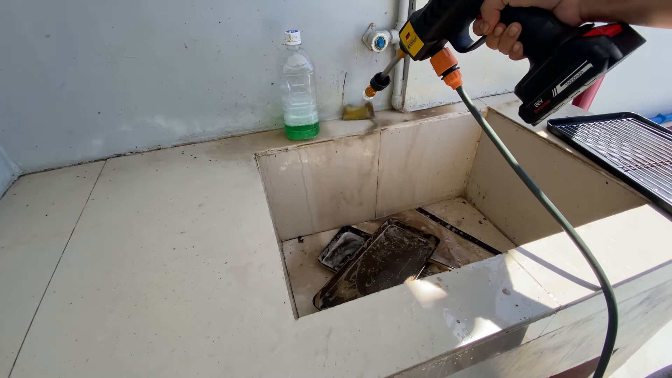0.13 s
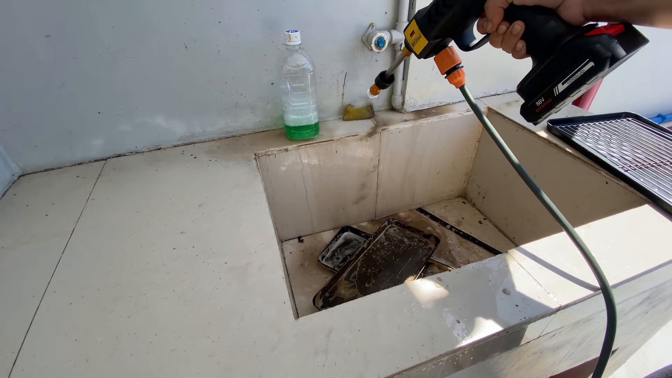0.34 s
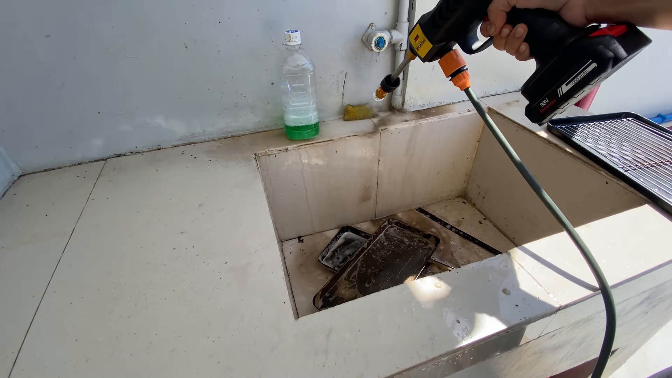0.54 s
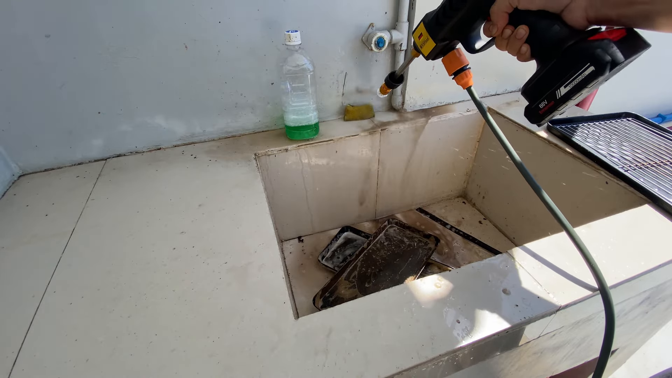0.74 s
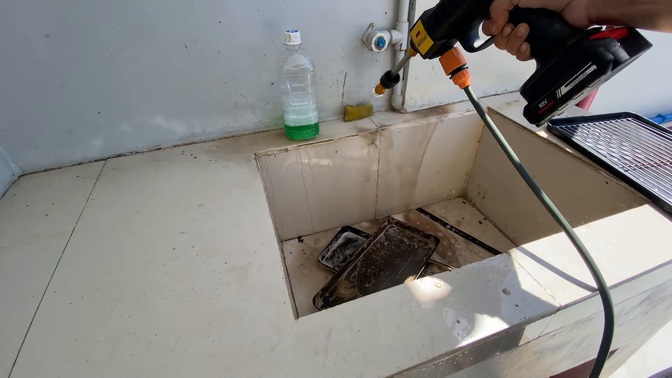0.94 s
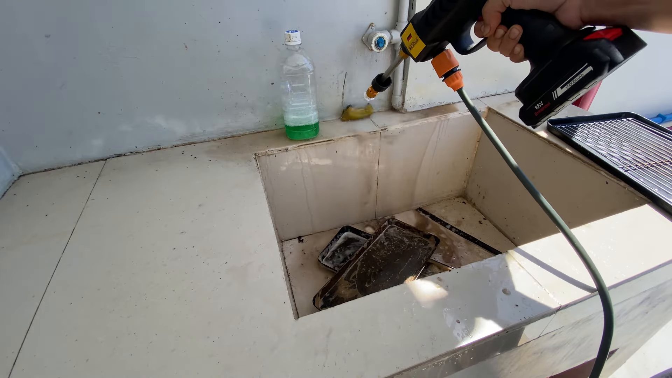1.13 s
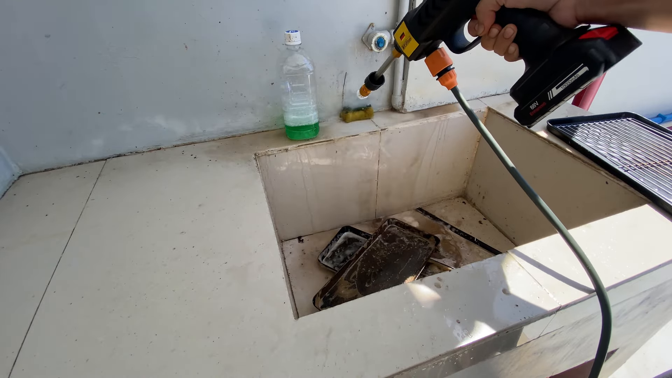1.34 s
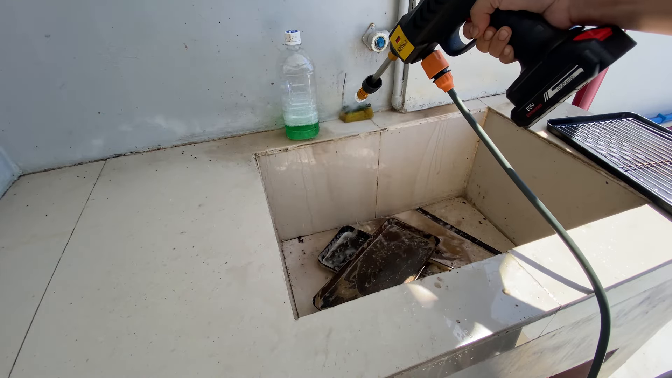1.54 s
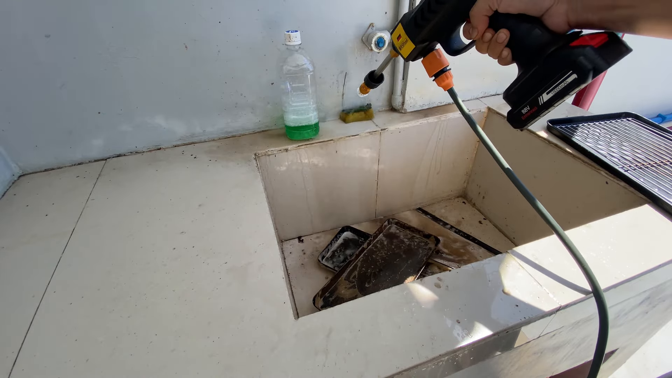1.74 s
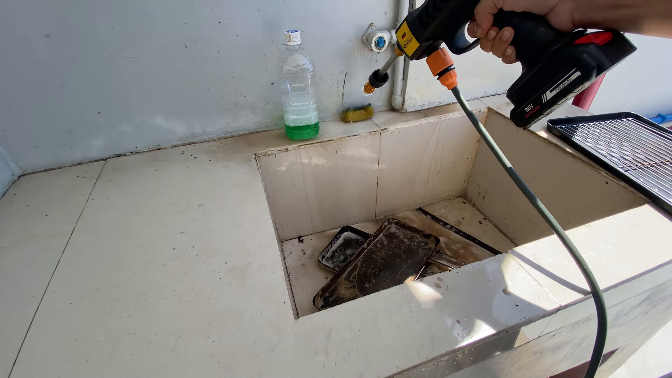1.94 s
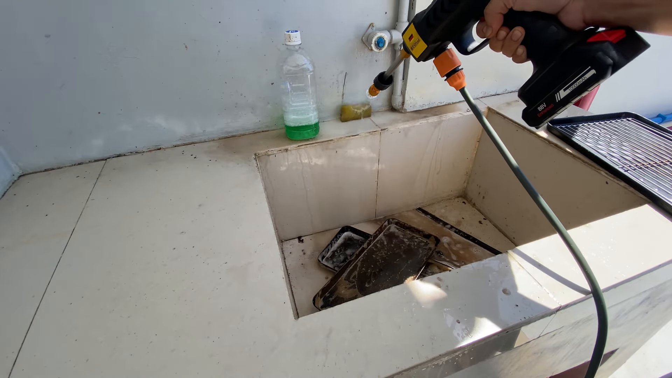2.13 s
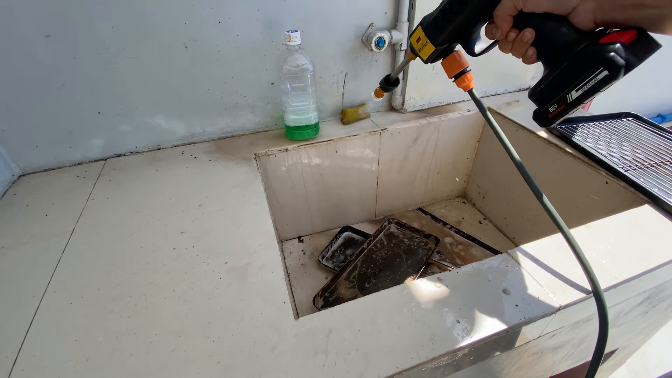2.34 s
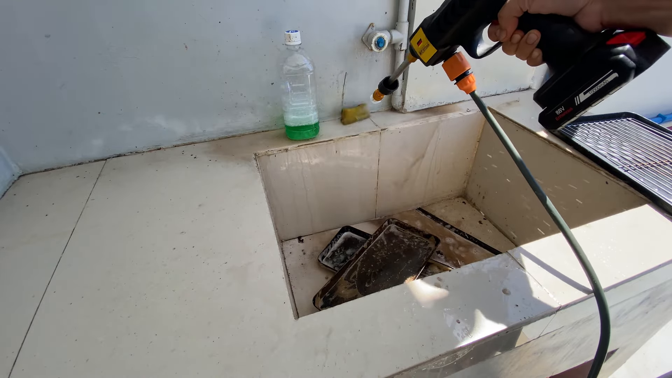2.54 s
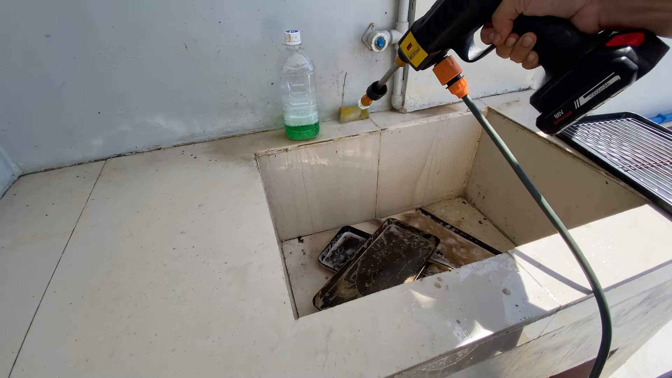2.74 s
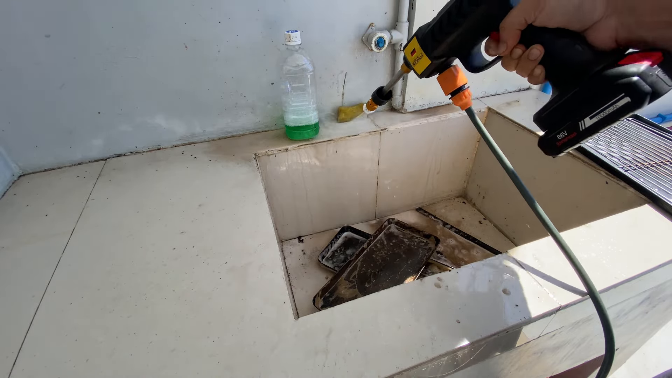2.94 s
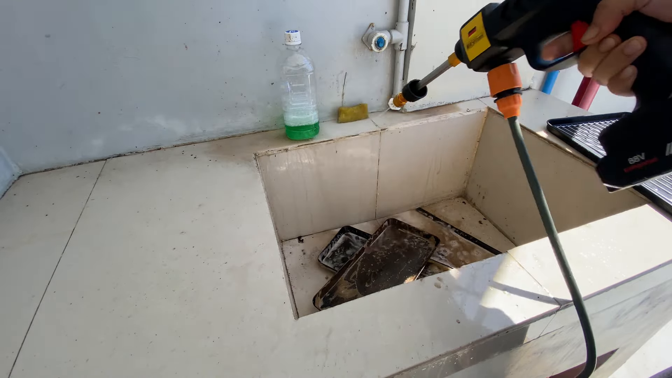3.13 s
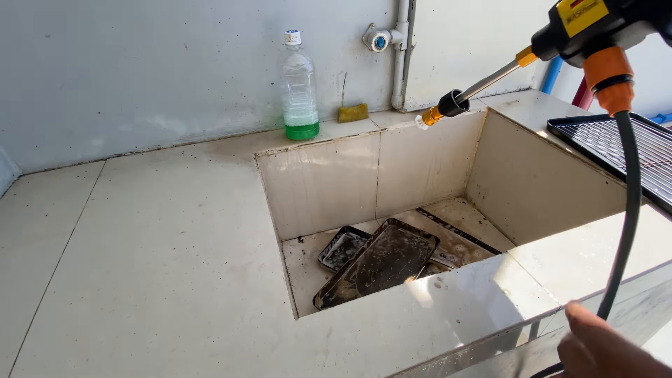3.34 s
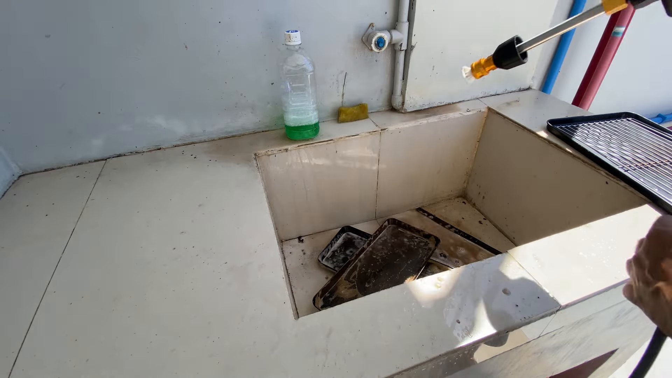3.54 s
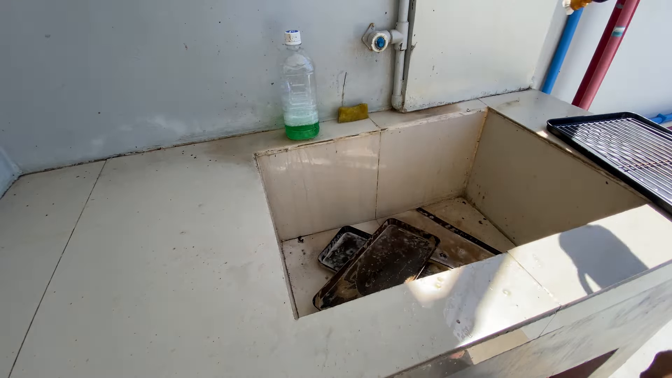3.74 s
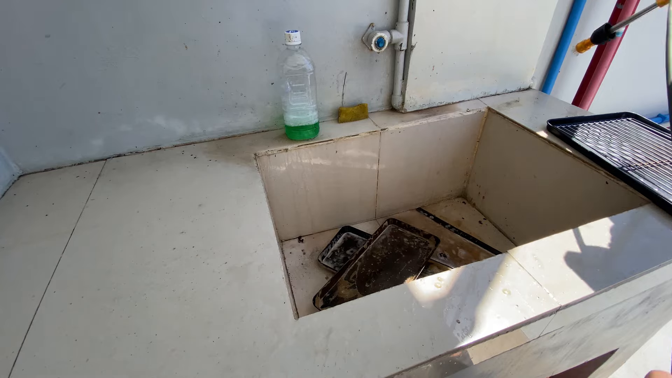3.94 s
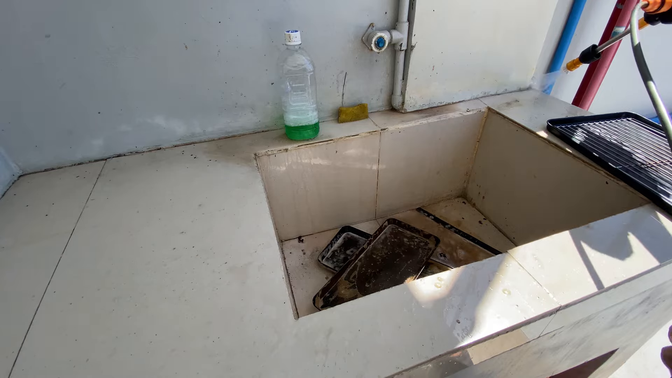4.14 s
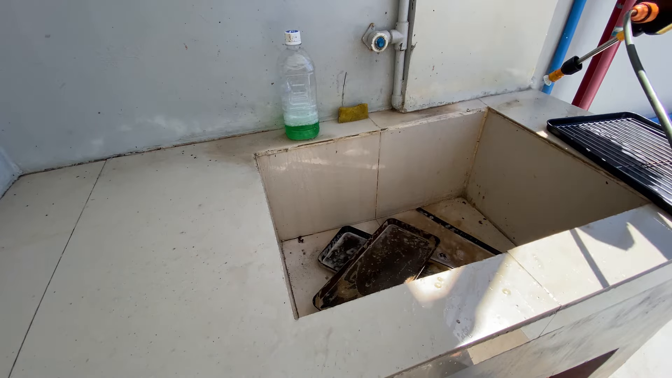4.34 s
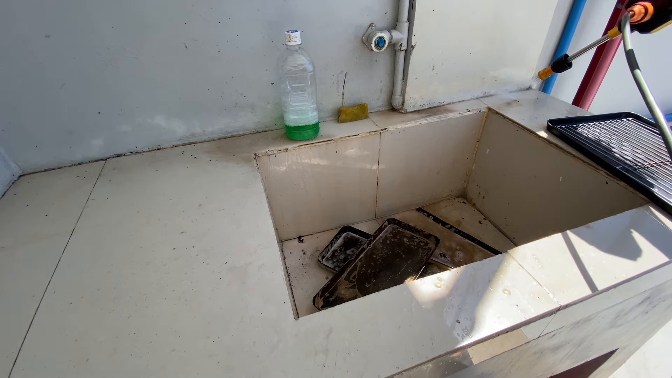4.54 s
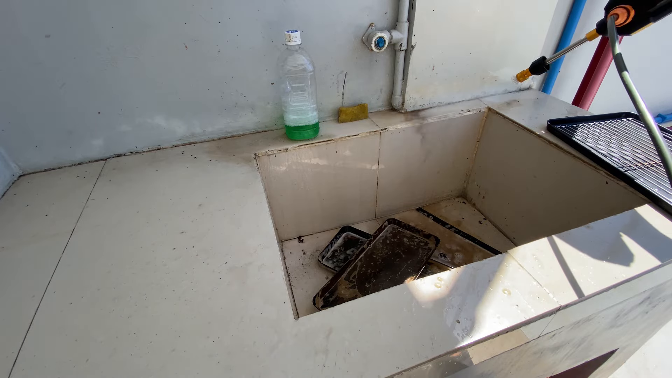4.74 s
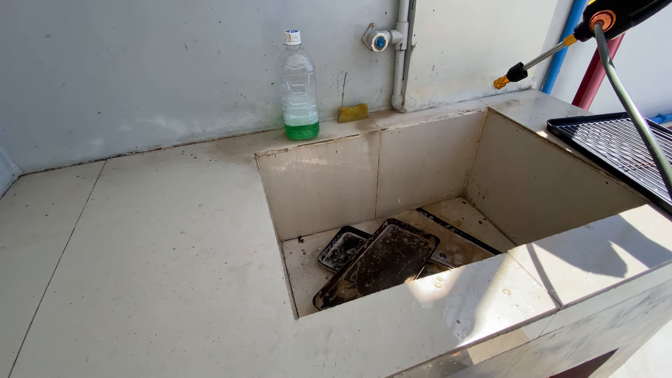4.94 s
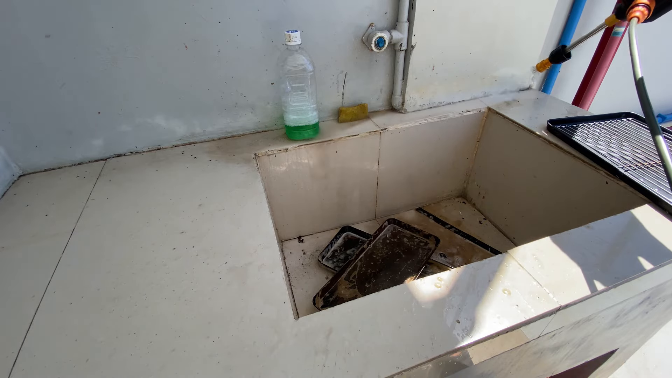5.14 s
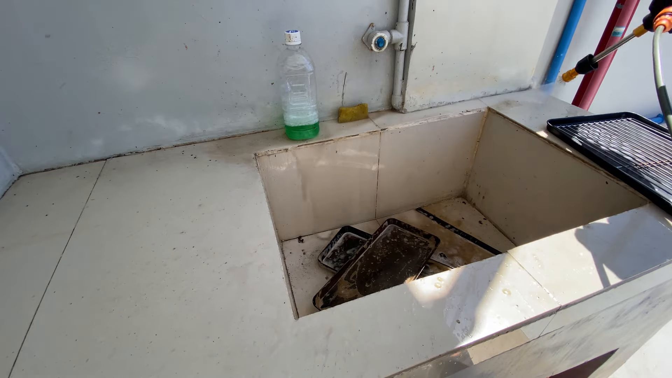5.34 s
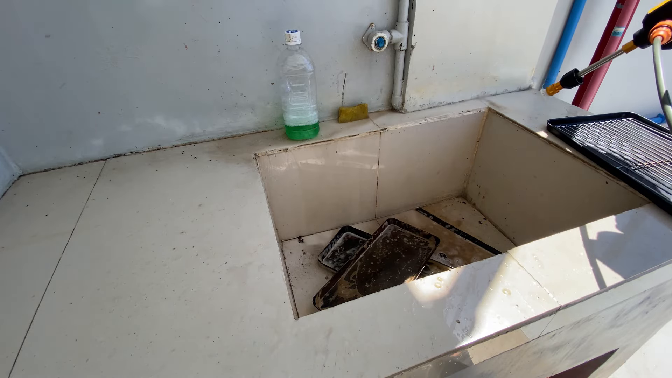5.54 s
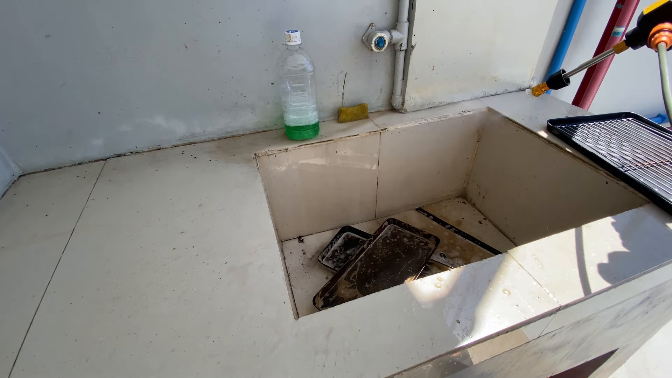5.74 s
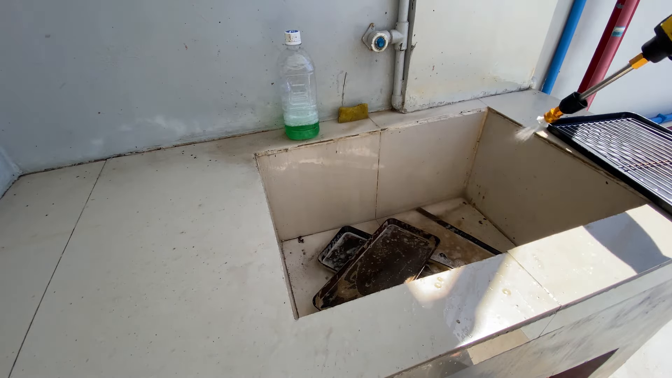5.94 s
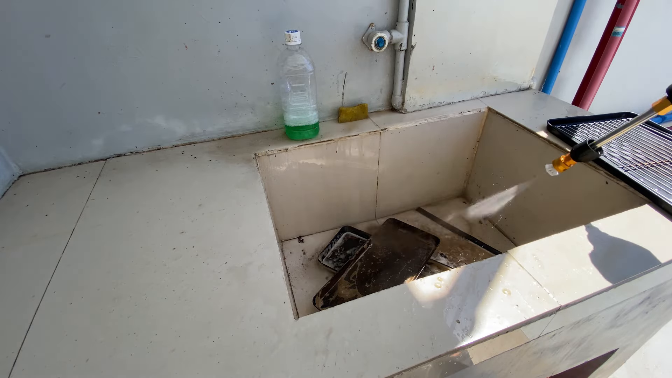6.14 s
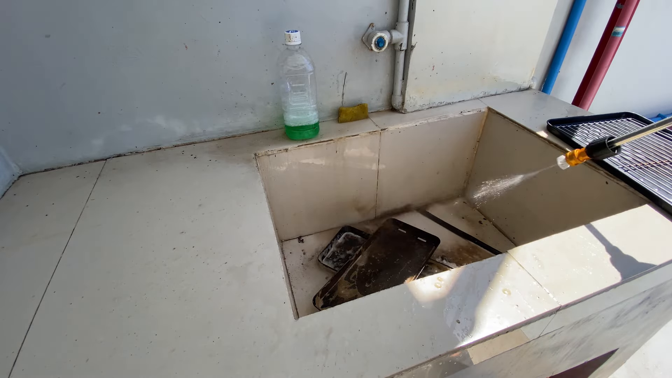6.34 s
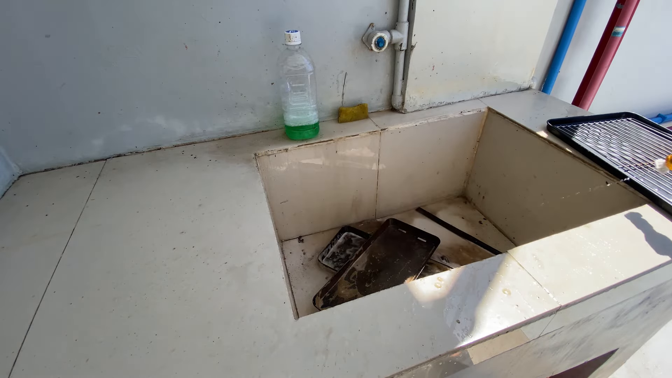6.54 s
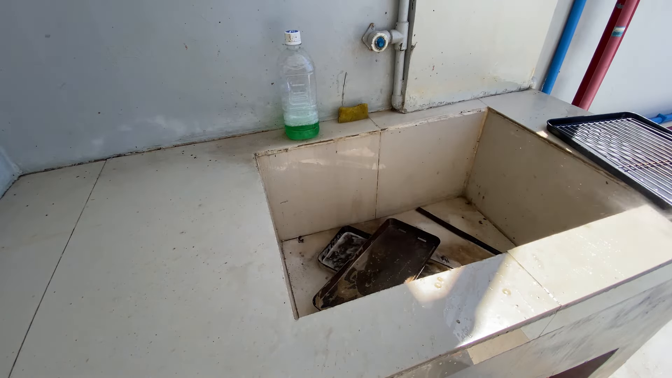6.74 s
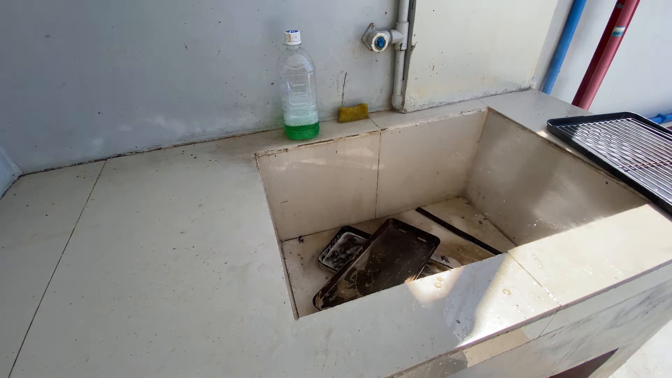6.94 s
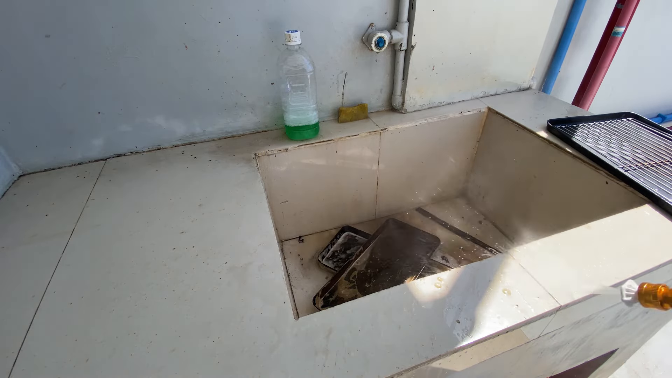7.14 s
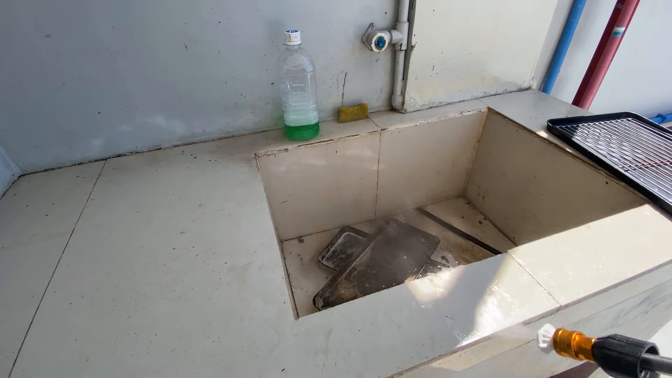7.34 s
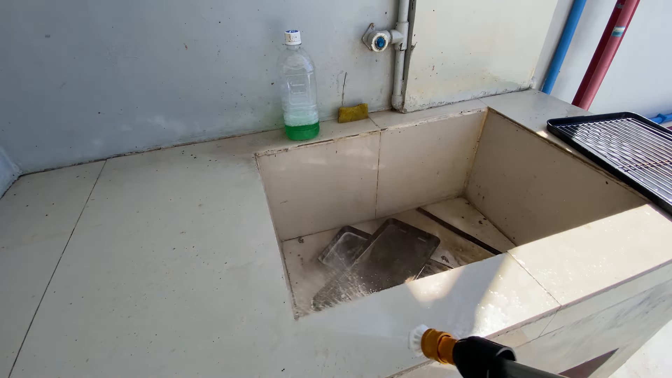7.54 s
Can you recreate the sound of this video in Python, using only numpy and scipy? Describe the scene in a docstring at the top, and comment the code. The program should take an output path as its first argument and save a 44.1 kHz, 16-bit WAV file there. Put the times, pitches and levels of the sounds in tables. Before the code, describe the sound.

A battery pressure washer is already spraying metal trays in a tiled outdoor sink: rapid pump buzz, motor whine, bright water hiss. It stops, the motor whirs down, and water drips while the drain gulps. A second, initially softer burst follows, then a brief gap with a dull plastic clack, and a final closer burst with a heavy low throb. Close stereo microphone, short tile echoes, faint outdoor rumble.

```python
"""A cordless pressure washer sprays metal trays in a tiled outdoor sink, in three bursts; the first is under way.
Its geared motor drives a piston pump: knocks, valve snaps and whines locked to the crank, rung through plastic.
The water is filtered noise and random droplets, pulsing with the pump, with whistles and a low throb of the jet.
Between bursts the motor coasts, run-off drips, the drain gulps and the gun knocks in the grip, over a low rumble.
The last burst is the closest; decaying noise tails stand for the echoes of the tiles."""
import sys
import numpy as np
from scipy import signal
from scipy.fft import rfft, irfft, next_fast_len
from scipy.io import wavfile

SR = 44100
rng = np.random.default_rng(int(sys.argv[2]) if len(sys.argv) > 2 else 0)


def put_to_file(sound):
    """Save the sound as 16-bit audio at rate SR, in the file named by the first command-line argument."""
    columns = np.atleast_2d(sound).T  # one column per channel
    safe = np.clip(columns, -1, 1)
    whole_steps = np.round(safe * 32767)
    wavfile.write(sys.argv[1], SR, whole_steps.astype(np.int16))


N = 334278
TIME = np.arange(N) / SR

# Trigger pulls: [pressed t/s, released t/s, spin-up/s, water pressure's time constant/s, nozzle level/dB]
BURSTS = [(-1, 2.963, .13, .25, -30.2), (3.966, 6.29, .12, .37, -30.5), (6.7, 8, .13, .3, -28.4)]
# Where the settings pass to the next burst [t/s]
BURST_CHANGES = (3.6, 6.6)
# Full motor speed under load [t/s, crank turns per s]
FULL_SPEED = [(1.7, 39.28), (1.9, 39.12), (2.95, 39.07), (4.15, 39.3), (5.7, 39.05), (6.2, 39.17),
              (6.88, 39.8), (7.05, 39.15), (7.58, 38.95)]
# Level curves for pump, valve, rotor and jet throb, before motor speed scales them [t/s, level/dB]
PUMP_LEVEL = [(0, -30), (1.4, -30.5), (2.9, -30.5), (4.1, -37), (4.7, -32.5), (5.4, -32), (5.9, -33.3),
              (6.3, -31), (6.8, -32), (7.1, -28), (7.58, -24.5)]
VALVE_LEVEL = [(0, -37.3), (2.9, -37), (4.05, -45), (4.35, -37.5), (4.9, -38), (5.3, -42.5), (6.2, -43),
               (6.85, -44), (7.2, -38), (7.58, -36)]
ROTOR_LEVEL = [(0, -48), (1.4, -44), (2.9, -45), (4.05, -42), (4.6, -39), (5.2, -44), (5.6, -42.5),
               (6.1, -50), (7.58, -48)]
THROB_LEVEL = [(4.2, -58), (4.5, -45), (5.1, -43), (5.4, -52), (5.85, -33.5), (6.3, -38), (6.8, -39),
               (6.95, -27.3), (7.58, -26.2)]
# Gear rattle as the motor runs up or down [t/s, level/dB]
RATTLE_LEVEL = [(2.96, -35.5), (3.08, -39), (3.13, -50), (4.0, -46), (6.29, -42), (6.41, -40), (6.46, -41),
                (6.5, -52), (6.72, -48)]
# Spray as the aim wanders over trays and tiles, one curve per burst, before its trim [t/s, level/dB]
SPATTER_LEVEL = [
    [(0.0, -29), (0.95, -33), (1.03, -29), (1.07, -33), (1.31, -29), (1.37, -35), (1.46, -28), (1.57, -33),
     (1.69, -29), (1.81, -38), (1.89, -28), (2.05, -38), (2.12, -29), (2.23, -37), (2.28, -33), (2.95, -33)],
    [(4.05, -39), (4.21, -35), (4.29, -30), (4.64, -34), (5.3, -36), (5.53, -28), (5.82, -39), (6.17, -32),
     (6.3, -36)],
    [(6.8, -37), (7.196, -37), (7.344, -28), (7.438, -34), (7.57, -35)],
]
# How strongly the trays ring under the spray [t/s, gain]
TRAY_GAIN = [(0, 0.7), (1.8, 1), (2.9, 0.37), (3.3, 0.23), (5.2, 0.86), (5.5, 0.58), (6.2, 0.49), (6.6, .2),
             (7.58, 0.84)]
# Housing resonances facing the microphone in each burst [f/Hz, width/Hz, level/dB, right minus left/dB]
HOUSING_ABOVE = [(196, 12, -17, 6), (355.4, 18, -5.5, 8.5), (420, 34, -7.5, 10), (520, 44, 0, 2),
                 (630, 50, -13, 5), (780, 13, 6, 6), (904, 20, 5, 9), (978, 25, 4, -5), (1780, 240, -18, 8),
                 (3360, 250, -5, 8)]
HOUSING_ASIDE = [(196, 12, -15, 6), (300, 60, -15, 8), (433, 20, -4.5, 8), (470, 15, -6, 8),
                 (585, 120, -4, 3), (703, 22.7, -1, 12), (815, 26, -0.5, 4.5), (975, 16, 1, 3),
                 (1068, 28, 1, 0), (1160, 30, -5, -3), (1650, 190, -1, -1), (3350, 250, -15, 10)]
HOUSING_CLOSE = [(325, 74, -10, 4), (428, 21, -3.5, 3), (570, 70, 1, 9), (640, 30, 5.5, 7),
                 (800, 52, 2.5, 9.5), (920, 36, 8, 7), (1080, 70, 2, 2), (1190, 64, 1, 1),
                 (1700, 150, -5, 4), (2800, 850, -13, 17.5)]
# Basin's standing wave driven by the pump, one row per burst [f/Hz, width/Hz, level against housing/dB]
BASIN_WAVE = [(790, 30, -7), (750, 110, -1.5), (765, 80, -6)]
# Shell resonances rung by the valve, one list per burst [f/Hz, width/Hz, level/dB]
SHELL_RING = [
    [(980, 85, 0), (1640, 260, -14), (1900, 200, -15)],
    [(680, 120, -6), (1060, 80, 0), (1300, 150, -11), (1640, 120, -4), (2030, 240, -5)],
    [(640, 90, 0), (920, 120, 0), (1720, 150, -7), (2350, 400, -6)],
]
# Resonances of the trays, of the sink under the run-off, and of the grip [f/Hz, width/Hz, level/dB]
TRAY_RING = [(2790, 160, -5), (3300, 130, 0), (5650, 120, -7), (6600, 350, -2)]
SINK_RING = [(570, 50, -4), (1020, 60, -1), (1450, 50, -1), (1950, 60, 1), (2450, 90, -4)]
GRIP_RING = [(310, 120, -11), (576, 110, -5), (861, 90, 5), (1130, 200, -6), (1450, 130, -2),
             (1940, 150, 0), (2430, 200, -12), (3040, 300, -16), (4900, 2000, -26)]
# Gear and motor tones [multiple of crank, level/dB in first, second and third burst]
GEAR_TONES = [(26, -47, -54, -52), (27, -50, -40, -45), (30, -50, -45, -46), (40, -45, -45, -52),
              (41, -48, -46, -54), (43, -54, -48, -39), (44, -45, -51, -43), (45, -46, -54, -39),
              (46, -44, -54, -54), (48, -47, -50, -50), (53, -56, -45, -54), (85, -47, -49, -47),
              (89, -48, -48, -49), (91, -48, -48, -47)]
# Strands of the gear rattle [multiple of crank, relative level/dB]
RATTLE_STRANDS = [(30, -11), (38, -14), (43, 0), (47, -3), (54, -15)]
# Noise colours, as filter outlines [f/Hz, level/dB]
JET_COLOUR = [(25, -30), (120, -15.5), (240, -13), (330, -15.5), (500, -4.5), (800, -2.5), (1050, 3.5),
              (1350, -2), (1700, -1.5), (2200, 0.8), (2550, -2.5), (2800, 2), (3500, 0), (3800, -4.5),
              (6000, -18), (15000, -18.5)]
SPATTER_COLOUR = [(30, -45), (400, -16.5), (1500, -1.5), (3000, -5.5), (4300, 1.5), (5300, 0.5), (6200, -1),
                  (6500, 7.5), (7350, -1), (7600, -8), (7950, -1), (8200, 2), (10000, -1), (13000, -3),
                  (16000, -14)]
DRIP_COLOUR = [(150, -45), (600, -8), (2000, -4.5), (8500, -6.5), (11000, -21), (16000, -25)]
AIR_COLOUR = [(20, -26), (40, -30), (65, 12.5), (100, -3.5), (140, 1.5), (195, -4), (250, -10.5),
              (500, -23), (1500, -10.5), (8000, -29)]
BUFFET_COLOUR = [(15, -25), (40, -2), (130, 1), (190, 1), (250, -6), (320, -2), (450, -16), (900, -60)]
PATTER_COLOUR = [(200, -11), (400, -7), (700, -3), (2000, -1), (4000, -6), (8500, -10), (12000, -36)]
# Whistles where the jet catches an edge or a hollow [start t/s, end t/s, f/Hz, width/Hz, level/dB]
WHISTLES = [(1.0, 2.17, 3300, 80, -43), (2.15, 2.56, 3290, 60, -44), (2.6, 2.95, 3530, 90, -43),
            (5.9, 6.42, 3180, 220, -42), (6.13, 6.3, 825, 40, -37), (0, 2.4, 5654, 25, -49)]
# Heaviest drips, before their attack softens them [t/s, level/dB]
DRIPS = [(3.1887, -30), (3.232, -35), (3.332, -35), (3.4, -30), (3.5514, -32), (3.588, -35), (3.6125, -27),
         (3.657, -33), (3.73, -35), (3.8142, -30), (3.8931, -30), (6.645, -31)]
# Single large bubbles, and the drain's chain of like bubbles before its trim [t/s, f/Hz, level/dB]
BIG_BUBBLES = [(3.135, 900, -35), (3.186, 1930, -31), (3.365, 1790, -34), (3.44, 1080, -41),
               (3.47, 1060, -41), (3.485, 333, -40), (3.56, 1750, -36), (3.587, 1450, -39),
               (3.612, 2400, -34), (3.745, 840, -40), (3.778, 1440, -41), (3.89, 1050, -40),
               (6.483, 1950, -38), (6.64, 1920, -37)]
GULPS = [(3.118, 576, -38), (3.167, 573, -36), (3.232, 576, -36), (3.272, 581, -36), (3.305, 570, -43),
         (3.385, 560, -44), (3.403, 549, -40), (3.435, 540, -44), (3.467, 576, -40), (3.563, 579, -37),
         (3.612, 576, -34), (3.667, 568, -34), (3.727, 571, -34), (3.778, 536, -41), (3.824, 579, -36),
         (3.887, 546, -35), (3.925, 560, -41), (3.992, 600, -36), (6.422, 670, -33), (6.45, 540, -35),
         (6.467, 640, -34), (6.51, 600, -45), (6.565, 570, -43), (6.702, 560, -33), (6.731, 630, -32),
         (6.795, 630, -29)]
# Contacts as the gun settles in the grip [t/s, relative level/dB]
KNOCKS = [(6.604, 0), (6.6087, -5), (6.6142, -4), (6.622, -13)]
# Colour difference between the ports [f/Hz, right minus left/dB]
RIGHT_BIAS = [(60, -6.5), (200, -13.5), (300, -3.5), (700, -3.5), (1300, 2.5), (2500, -2.5), (4400, 4),
              (7800, 6.5), (9000, 4), (11000, -2.5)]
# How late the left port hears the main sources [t/s, lag/ms]
SOURCE_LAG = [(0, 0.44), (2.9, .45), (3.6, .1), (4.3, 0.24), (5.8, 0.3), (6.4, 0.34), (7.58, 0.45)]

COAST_S, FRICTION = .25, .3  # time constant; friction as a share of full speed
ROTOR_ORDER = 42  # multiple of the crank
SPATTER_GAIN_DB, SPATTER_POWER, FIZZ_DB = 2.5, 2.0, -53.5  # trim; power law in flow; fizz left on wet trays
BUBBLES_PER_S, BUBBLE_LOW_HZ, BUBBLE_HIGH_HZ, BUBBLE_DB = 24, 800, 2100, -49
SPLASH_DB = 6  # a stray bubble's splash above the bubble's own level
GULP_HZ = 570  # pitch at which a bubble swells in its nominal time
PIPE_HZ, PIPE_WIDTH_HZ, PIPE_DB, DRAIN_LAG_MS = 570, 55, -53, .35
CUTOFF_HZ = 16000


def from_db(db):
    """Decibels to gain."""
    return 10 ** (np.asarray(db) / 20)


def rms_one(x):
    """Scale to unit rms."""
    return x / np.sqrt(np.mean(x ** 2) + 1e-20)


def in_time(rows):
    """Draw a curve through the rows at every sample."""
    return np.interp(TIME, *np.transpose(rows))


def coloured(x, points):
    """Filter by an outline, straight in dB over log frequency."""
    size = next_fast_len(N + 4096)
    hz, db = np.transpose(points)
    bins = np.maximum(np.arange(size // 2 + 1) * SR / size, 1)
    gain = from_db(np.interp(np.log(bins), np.log(hz), db))
    return irfft(rfft(x, size) * gain, size)[..., :N]


def drift(rate):
    """Smooth random wander of rms 1, with about `rate` turns a second."""
    knots = rng.standard_normal(8000)
    return rms_one(np.interp(TIME * rate * 2, np.arange(len(knots)), knots))


def resonate(x, modes):
    """Parallel two-pole resonances, signs alternating."""
    out = 0
    for k, (hz, width, db) in enumerate(modes):
        r = np.exp(-np.pi * width / SR)
        poles = [1, -2 * r * np.cos(2 * np.pi * hz / SR), r * r]
        ring = signal.lfilter([1, 0, -1], poles, x + 1e-18)
        out = out + (-1) ** k * from_db(db) * (1 - r * r) / 2 * ring
    return out


def add(track, s, sound):
    """Mix a short sound in at time s."""
    at = int(s * SR)
    track[at:at + len(sound)] += sound[:N - at]


def scatter(x, delays_ms, bounce):
    """All-pass echoes smear each knock without colouring it."""
    size = next_fast_len(N + 8192)
    spectrum, g = rfft(x, size), np.clip(bounce, 0, .85)
    hz = np.arange(len(spectrum)) * SR / size
    for ms in delays_ms:
        z = np.exp(-2j * np.pi * hz * ms / 1000)
        spectrum = spectrum * (z - g) / (1 - g * z)
    return irfft(spectrum, size)[:N]


def pan(db):
    """Left and right gains for a right-minus-left difference."""
    return from_db(np.array([[-1], [1]]) * db / 2)


def at_ports(x, lag_ms):
    """Sound from the right reaches the left port late."""
    left, right = np.broadcast_to(x, (2, N))
    return np.array([np.interp(TIME - lag_ms / 1000, TIME, left), right])


def spread(x, diffuse_db):
    """A steady noise as a wide source: a common part plus an unrelated part at each port."""
    unrelated = np.array([np.roll(x, N // 3), np.roll(x, -N // 3)])
    return rms_one(at_ports(x, in_time(SOURCE_LAG)) + from_db(diffuse_db) * unrelated)


def wall_echoes(x, t60):
    """The tiles return a short diffuse tail on each side."""
    t = TIME[:SR // 3]
    tail = rng.standard_normal((2, len(t))) * from_db(-60 * t / t60) * (t > .001)
    tail /= np.sqrt(np.sum(tail ** 2, axis=1, keepdims=True))
    return signal.fftconvolve(x, tail, axes=1)[:, :N]


def in_sink(x, wet_db, t60):
    """Direct sound plus the echoes of the basin."""
    direct = at_ports(x, in_time(SOURCE_LAG))
    return direct + from_db(wet_db) * wall_echoes(direct, t60)


def air(level_db=-50, apart=0.29):
    """Low outdoor rumble, mostly common to both ports."""
    noise = rng.standard_normal(N) + apart * rng.standard_normal((2, N))
    return from_db(level_db) * rms_one(coloured(noise, AIR_COLOUR))


def droplets(per_s, size_db):
    """Random impacts of very uneven size; rms 1."""
    sizes = from_db(size_db * np.minimum(rng.exponential(1, N), 5)) * rng.choice([-1, 1], N)
    return rms_one(sizes * (rng.random(N) < per_s / SR))


def trickle(level_db=-50.5, ring_db=-49):
    """Run-off patters as coloured droplets, while sparser drops ring the wet sink and trays faintly."""
    patter = spread(coloured(droplets(per_s=900, size_db=3.5), PATTER_COLOUR), diffuse_db=10)
    ring = spread(resonate(droplets(per_s=120, size_db=3), SINK_RING), diffuse_db=3)
    return (from_db(level_db) * patter + from_db(ring_db) * ring) * from_db(2 * drift(8.8))


def at_random(per_s, db, spread_db):
    """Chance events as rows of (s, dB, a draw from 0 to 1), with exponential gaps."""
    gap, size, draw = rng.random((400, 3)).T
    times = np.cumsum(-np.log(1 - gap)) / per_s
    rows = np.transpose([times, db + spread_db * (2 * size - 1), draw])
    return rows[rows[:, 0] < TIME[-1]]


def bubbles():
    """Stray small bubbles as rows of (s, Hz, dB), pitched evenly over log frequency."""
    span = BUBBLE_HIGH_HZ / BUBBLE_LOW_HZ
    events = at_random(BUBBLES_PER_S, BUBBLE_DB, spread_db=4)
    return [(s, BUBBLE_LOW_HZ * span ** draw, db) for s, db, draw in events]


def drips(bubble_rows, t60=0.045, swell_s=.005):
    """Run-off slaps the wet floor in short bright splashes; each stray bubble bursts with its own."""
    level, t = np.zeros(N), TIME[:SR // 6]
    splashes = [(s, db + SPLASH_DB) for s, _, db in bubble_rows]
    for s, db in DRIPS + splashes:
        add(level, s, from_db(db - 60 * t / t60) * (1 - np.exp(-t / swell_s)))
    return level * spread(coloured(rng.standard_normal(N), DRIP_COLOUR), diffuse_db=8)


def ringing_bubbles(bubble_rows, swell_s=0.006, rise=0.13, wobble=.65):
    """Each bubble swells, rings unevenly and rises a little in pitch."""
    out, t = np.zeros(N), TIME[:SR // 10]
    wander = np.cumsum(rng.standard_normal((64, len(t))), axis=1)
    for k, (s, hz, db) in enumerate(bubble_rows):
        unevenness = wobble * wander[k % len(wander)] * np.sqrt(hz / SR)
        phase = 2 * np.pi * hz * t * (1 + rise * t) + unevenness
        age = t / swell_s * np.sqrt(hz / GULP_HZ)  # small, high bubbles die sooner
        add(out, s, from_db(db) * age * np.exp(1 - age) * np.sin(phase))
    return out


def drain_gulps(level_db=1, wet_db=-9):
    """The drain swallows air in a chain of like bubbles, over a steady hollow note of its pipe."""
    mode = [(PIPE_HZ, PIPE_WIDTH_HZ, 0)]
    pipe = from_db(PIPE_DB) * rms_one(resonate(resonate(rng.standard_normal(N), mode), mode))
    chain = from_db(level_db) * ringing_bubbles(GULPS, swell_s=.008, rise=.1, wobble=.3)
    direct = at_ports(pipe + chain, DRAIN_LAG_MS)
    return direct + from_db(wet_db) * wall_echoes(direct, t60=.11)


def grip_knock(crack_t60=.04, crunch=.05, peak_db=-20):
    """A dull plastic clack: quick contacts, each a click and a noise crunch, ring the grip."""
    contact, t = np.zeros(N), TIME[:SR // 8]
    for s, db in KNOCKS:
        crack = crunch * from_db(-60 * t / crack_t60) * rng.standard_normal(len(t))
        add(contact, s, from_db(db) * ((t == 0) + crack))
    body = resonate(contact, GRIP_RING)
    direct = at_ports(from_db(peak_db) * body / np.abs(body).max(), lag_ms=.1)
    return direct + from_db(-7) * wall_echoes(direct, t60=.1)


def pressure(turns, speed, first, second):
    """Water pressure ripples with every piston stroke, two a turn."""
    stroke = 2 * np.pi * 2 * turns
    return 1 + speed * (first * np.cos(stroke) + second * np.cos(2 * stroke))


def spatter(turns, speed, mist=0.63, tray_db=-9):
    """Countless droplets strike over a fine mist and ring the trays."""
    hits = droplets(per_s=4000, size_db=3.0) + mist * rng.standard_normal(N)
    ring = spread(resonate(hits, TRAY_RING), diffuse_db=12)
    ring = ring * from_db(tray_db + 2.5 * drift(12)) * in_time(TRAY_GAIN)
    splash = spread(coloured(hits, SPATTER_COLOUR), diffuse_db=6.0)
    ripple = pressure(turns, speed, first=.22, second=0.064)
    return (splash + ring) * ripple * from_db(1.0 * drift(25))


def whistles(flicker_db=2, fade_s=.03):
    """Breathy, beaded tones of narrow noise that last while the jet stays on one spot."""
    out = np.zeros(N)
    for start, end, hz, width, db in WHISTLES:
        held = np.clip(np.minimum(TIME - start, end - TIME) / fade_s, 0, 1)
        mode = [(hz, width, 0)]
        out += from_db(db) * held * rms_one(resonate(resonate(rng.standard_normal(N), mode), mode))
    return out * rms_one(from_db(flicker_db * drift(20)))


def throb(turns, overtone_db=-17.5, buffet_db=-20):
    """The jet pushes air twice a turn, over a low noise of buffeting."""
    stroke = 2 * np.pi * 2 * turns
    overtone = from_db(overtone_db) * np.sin(2 * stroke) * from_db(2 * drift(12))
    pulse = rms_one(np.sin(stroke) + overtone)
    buffet = rms_one(coloured(rng.standard_normal(N), BUFFET_COLOUR))
    return pulse + from_db(buffet_db) * buffet


def jet(turns, speed):
    """Turbulent rush of the nozzle, pulsing with the pump."""
    rush = spread(coloured(rng.standard_normal(N), JET_COLOUR), diffuse_db=8.5)
    ripple = pressure(turns, speed, first=0.053, second=0.07)
    return rush * speed ** 1.33 * ripple * from_db(0.76 * drift(25) + 1.6 * drift(300))


def motor(coast_times):
    """Share of full drive: a quick rise when the trigger is pressed, a slower fall when it is released."""
    speed = np.zeros(N)
    for (pressed, released, spin_up, _, _), coast_s in zip(BURSTS, coast_times):
        rise = 1 - (1 - np.clip((TIME - pressed) / spin_up, 0, 1)) ** 2
        coast = (1 + FRICTION) * np.exp(-np.maximum(TIME - released, 0) / coast_s) - FRICTION
        speed = np.maximum(speed, rise * coast)
    return speed


def coasting(turns, speed, rough=.75, wet_db=-6, lag_ms=.15):
    """Off load the gear teeth sing in rough strands that glide with the motor, with the basin's echoes."""
    slack = np.clip(40 * (1 - speed), 0, 1) * np.clip(10 * speed - 2, 0, 1)  # silent at full speed and at rest
    rattle = 0
    for order, db in RATTLE_STRANDS:
        roughness = 1 + rough * (drift(70) + 1j * drift(70))  # wanders in level and phase
        rattle = rattle + from_db(db) * np.real(roughness * np.exp(2j * np.pi * order * turns))
    direct = at_ports(from_db(in_time(RATTLE_LEVEL)) * slack * rms_one(rattle) * pan(3), lag_ms)
    return direct + from_db(wet_db) * wall_echoes(direct, t60=.08)


def rotor(turns, speed, waver_db=2.5, flutter=.3):
    """The rotor's thin, wavering whine at a fixed multiple of the crank."""
    level = from_db(in_time(ROTOR_LEVEL) + waver_db * drift(12))
    return level * np.sin(2 * np.pi * ROTOR_ORDER * turns + flutter * drift(25)) * speed ** 4


def gears(turns, speed, flutter=0.14):
    """Teeth and motor sing at multiples of the crank; which ones carry depends on how the gun is held."""
    burst = np.searchsorted(BURST_CHANGES, TIME)
    tones = 0
    for order, *db in GEAR_TONES:
        level = from_db(np.array(db)[burst] + 2 * drift(15))
        tones = tones + level * np.sin(2 * np.pi * order * turns + flutter * drift(25))
    return tones * speed ** 4 * pan(2)


def valve(turns, speed, rough_db=1.0, rebound=.3, lag_ms=.13, right_db=-1):
    """The valve snaps shut once a turn, with a weak rebound, and rings the shell in a throbbing buzz."""
    snaps = np.diff(np.floor(turns), prepend=0)
    snaps = snaps + rebound * np.diff(np.floor(turns + 2 / 3), prepend=0)  # a third of a turn later
    snaps = snaps * from_db(rough_db * drift(30))
    burst, buzz = np.searchsorted(BURST_CHANGES, TIME), np.zeros(N)
    for k, modes in enumerate(SHELL_RING):
        buzz[burst == k] = rms_one(resonate(snaps[burst == k], modes))
    return at_ports(buzz * from_db(in_time(VALVE_LEVEL)) * speed ** 2, lag_ms) * pan(right_db)


def pump(turns, speed, back_stroke=0.12, rough_db=1.0):
    """One hard knock a turn and a softer return ring housing and basin; each resonance radiates its own way."""
    knocks = np.diff(np.floor(turns), prepend=0)
    knocks = knocks + back_stroke * np.diff(np.floor(turns + .5), prepend=0)
    knocks = scatter(knocks * from_db(rough_db * drift(30)), delays_ms=(3.1, 4.7, 7.3), bounce=0.48)
    burst, housing, basin = np.searchsorted(BURST_CHANGES, TIME), np.zeros((2, N)), np.zeros(N)
    for k, modes in enumerate((HOUSING_ABOVE, HOUSING_ASIDE, HOUSING_CLOSE)):  # the gun turns between bursts
        now = burst == k
        sides = [[(hz, width, db + sign * bias / 2) for hz, width, db, bias in modes] for sign in (-1, 1)]
        housing[:, now] = rms_one(np.array([resonate(knocks[now], side) for side in sides]))
        hz, width, db = BASIN_WAVE[k]
        basin[now] = from_db(db) * rms_one(resonate(knocks[now], [(hz, width, 0)]))
    standing_wave = np.array([-basin, basin])  # opposite in sign at the two ports
    return (in_sink(housing, wet_db=-14, t60=.2) + standing_wave) * speed ** 1.4


def scene():
    """The trigger sets the motor speed, which drives pump, gears and the pulsing of the water."""
    speed = motor([COAST_S] * len(BURSTS))
    flow = motor([bleed_s for _, _, _, bleed_s, _ in BURSTS])
    turns = np.cumsum(speed * in_time(FULL_SPEED) * (1 + .0013 * drift(15))) / SR

    machine = from_db(in_time(PUMP_LEVEL)) * pump(turns, speed) + valve(turns, speed)
    machine = machine + rotor(turns, speed) + coasting(turns, speed)
    machine = machine + in_sink(gears(turns, speed), wet_db=-13, t60=.2)

    rush_db = np.array(BURSTS)[np.searchsorted(BURST_CHANGES, TIME), -1]
    rush = from_db(rush_db) * jet(turns, flow)
    landing = from_db(in_time(np.vstack(SPATTER_LEVEL)) + SPATTER_GAIN_DB) * flow ** SPATTER_POWER
    water = rush + (landing + from_db(FIZZ_DB)) * spatter(turns, flow) + whistles() * pan(3)
    water = water + from_db(-8) * wall_echoes(water, t60=.09)
    low = from_db(in_time(THROB_LEVEL)) * throb(turns) * speed ** 3

    strays = bubbles()
    run_off = in_sink(ringing_bubbles(BIG_BUBBLES + strays), wet_db=-2, t60=0.11)
    run_off = run_off + drain_gulps() + drips(strays) + trickle()
    return machine + water + low + run_off + grip_knock() + air()


def record(dry):
    """The two ports differ in colour, the image narrows in the top treble, and the top is cut."""
    left = coloured(dry[0], [(hz, -db / 2) for hz, db in RIGHT_BIAS])
    right = coloured(dry[1], [(hz, db / 2) for hz, db in RIGHT_BIAS])
    side = coloured((left - right) / 2, [(10000, 0), (11500, -25)])
    ports = (left + right) / 2 + np.array([side, -side])
    return signal.sosfilt(signal.ellip(12, .1, 90, CUTOFF_HZ, fs=SR, output="sos"), ports)


dry = scene()
out = record(dry)
put_to_file(out)
```